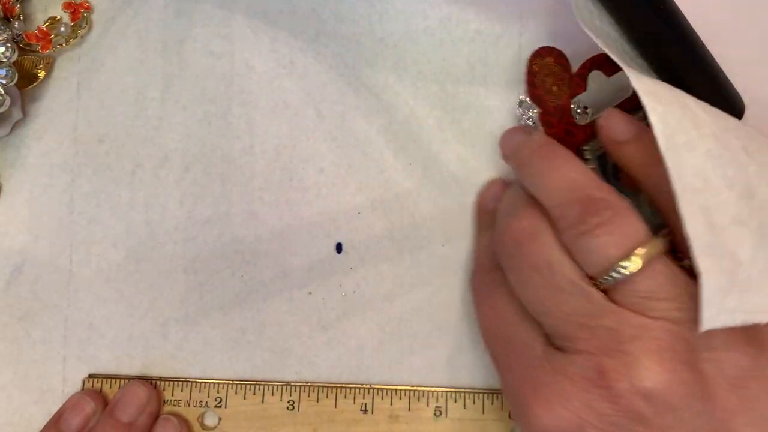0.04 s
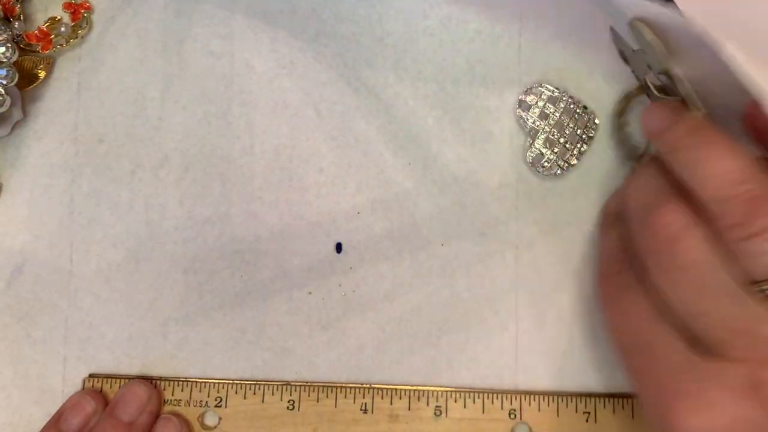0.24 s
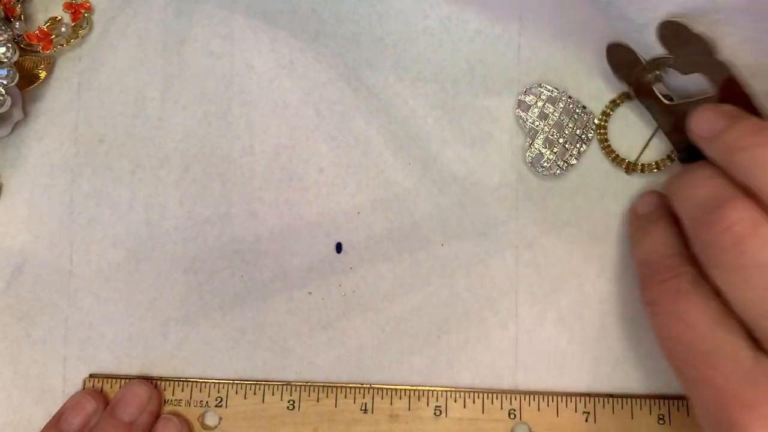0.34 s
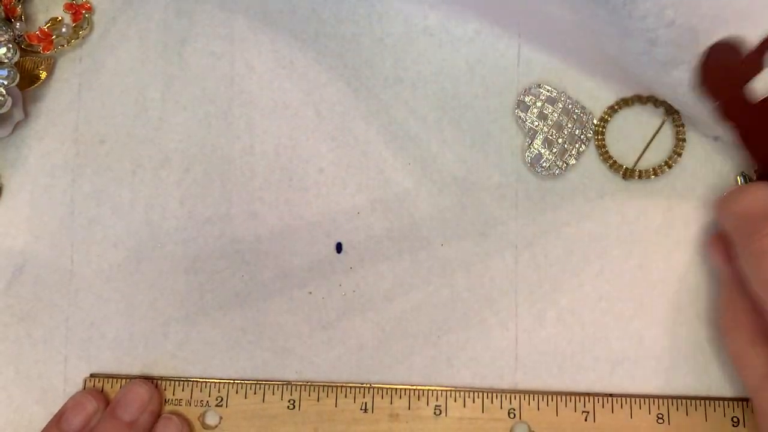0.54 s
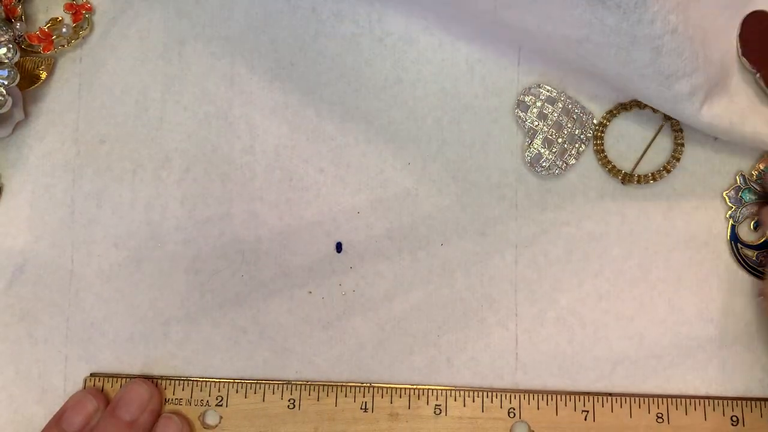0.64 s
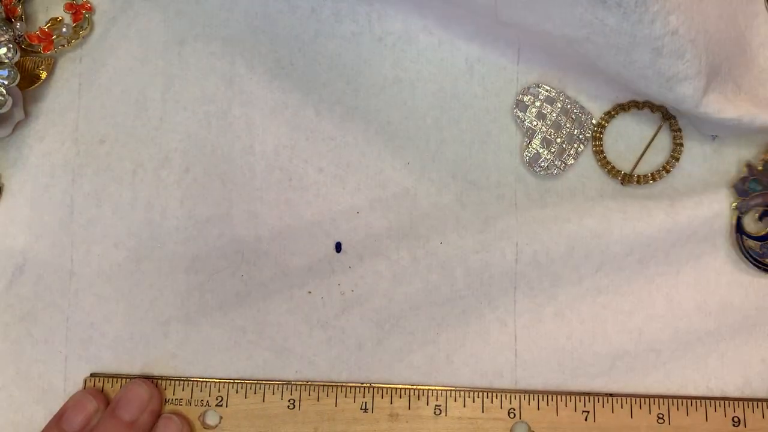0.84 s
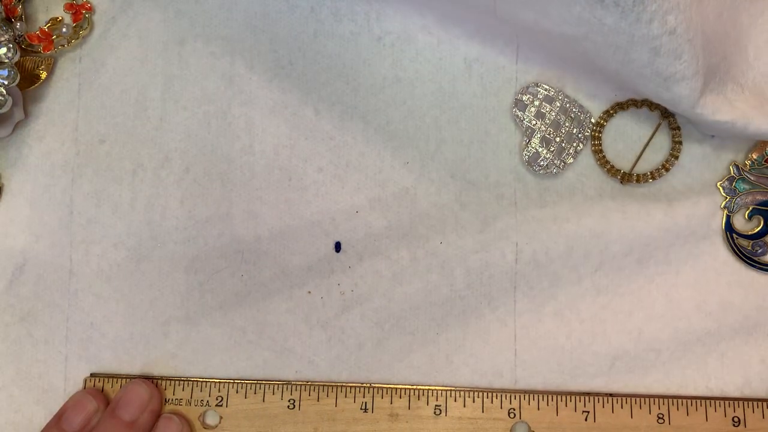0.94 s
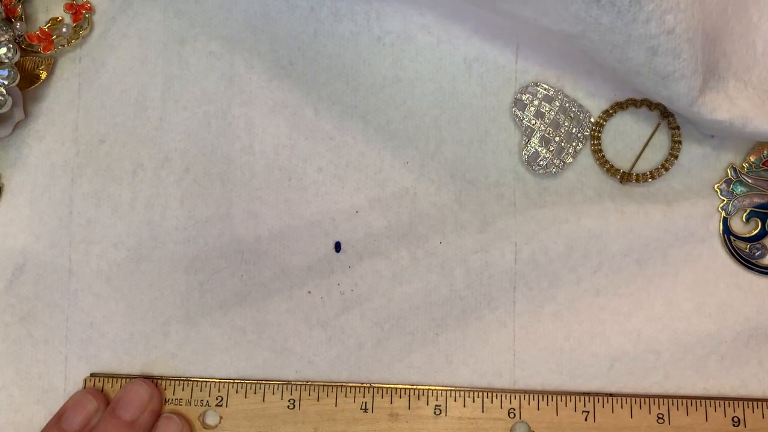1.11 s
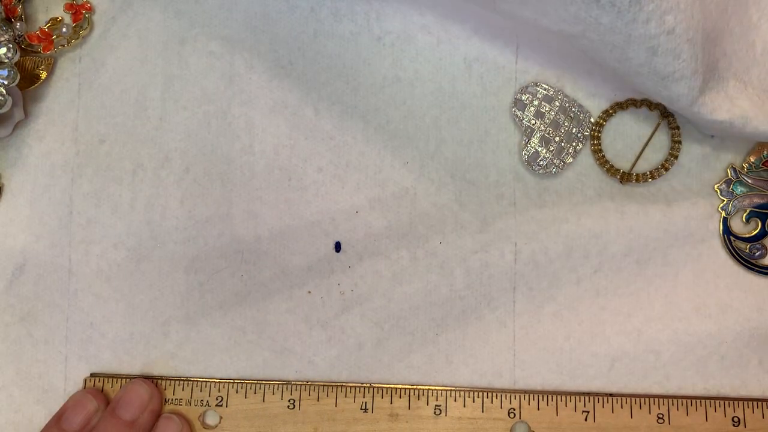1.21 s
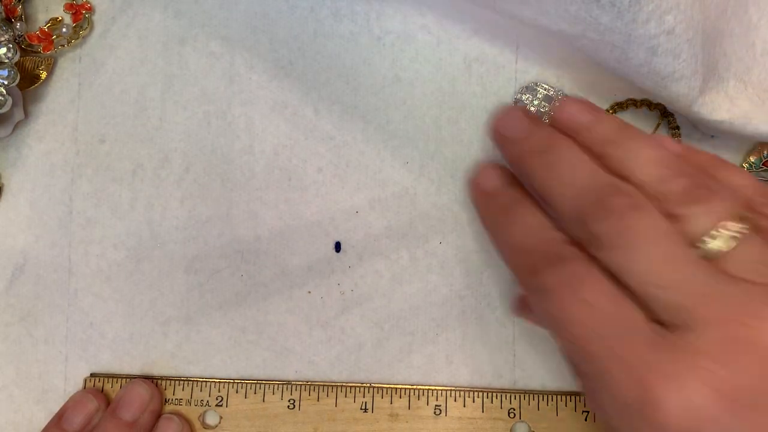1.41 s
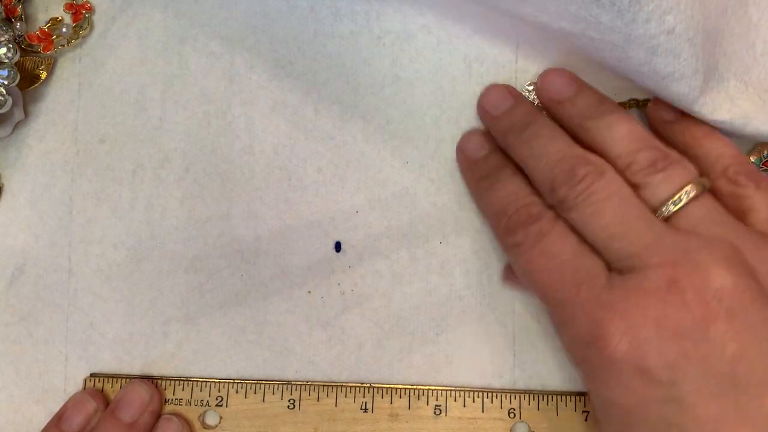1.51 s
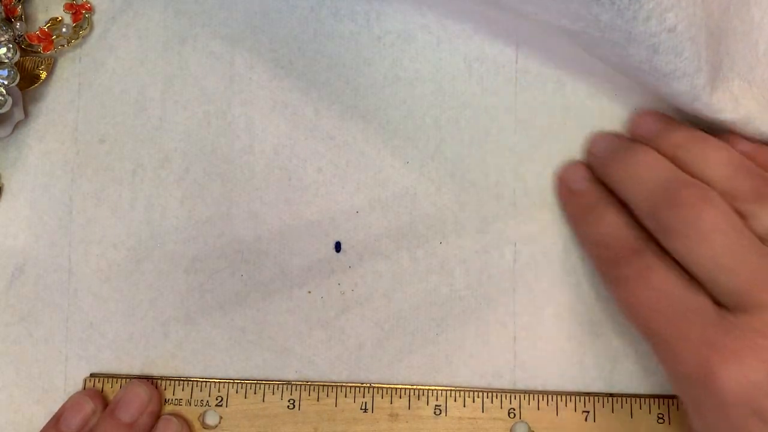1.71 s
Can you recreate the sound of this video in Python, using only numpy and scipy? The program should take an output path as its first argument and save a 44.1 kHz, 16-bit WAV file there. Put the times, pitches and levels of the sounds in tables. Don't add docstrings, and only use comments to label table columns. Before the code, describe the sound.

Close up in a quiet room, thin metal pins jingle and rub over cloth, a heavy piece hits the wooden table, sparser clinks follow, then stillness and a soft hand rustle with a tiny tick.

```python
import sys
import numpy as np
from scipy import signal
from scipy.fft import rfft, irfft, next_fast_len
from scipy.io import wavfile
from scipy.ndimage import uniform_filter1d

SR = 44100
rng = np.random.default_rng(int(sys.argv[2]) if len(sys.argv) > 2 else 0)


def linear_from_db(decibels):
    return 10 ** (np.asarray(decibels, float) / 20)


def unload_wav(signal):
    wavfile.write(
        sys.argv[1],
        SR,
        np.round(np.clip(np.atleast_2d(signal).T, -1, 1) * 32767).astype(np.int16),
    )


N = 77175

# time in seconds, level in dB.
SCRAPE_LEVEL = [(0, -50), (.19, -39), (.21, -35), (.33, -35.5), (.41, -41.5), (.45, -36), (.5, -39.5),
                (.57, -33), (.78, -36.5), (.8, -38), (.825, -46.5), (.9, -40.5), (1.05, -46.5), (1.07, -58),
                (1.13, -64.5), (1.15, -47), (1.23, -65), (1.3, -120)]
# frequency in Hz, density in dB per Hz.
CLOTH_COLOUR = [(300, 0), (1000, 0), (2400, -0.5), (3800, 1), (7500, 0), (12000, -5), (16000, -4.5)]
BROOCH_MODES = [3050, 3700, 4300, 5500, 6400, 7600, 8700, 10050, 11400, 12400, 14050, 15300]
# start in seconds, peak in dB, ring in Hz.
CLINKS = [(0.0253, -33.5, 5660), (0.1062, -27.5, 4140), (0.1437, -27.5, 7530), (0.2034, -26, 3030),
          (0.2149, -23.5, 7780), (0.2448, -25, 7640), (0.2947, -24.5, 7660), (0.3209, -12.5, 3840),
          (0.382, -27, 7570), (0.4209, -29.5, 7410), (0.6215, -16, 2930), (0.631, -23.5, 7180),
          (0.7312, -35, 6600), (0.8584, -37.5, 7750), (0.8984, -32, 7570), (0.9224, -21, 7344),
          (1.0128, -24.5, 3470), (1.042, -34, 5560), (1.0856, -44, 6470), (1.1387, -31.5, 3750),
          (1.1554, -27.5, 4190), (1.1643, -24, 3790), (1.1794, -33, 3760), (1.2121, -31.5, 3576)]
# start in seconds, peak in dB, ring in Hz.
TINKS = [(0.0687, -40.5, 10760), (0.2039, -35, 15300), (0.2338, -28, 14500), (0.274, -34, 10860),
         (0.3212, -23, 9830), (0.3343, -26.5, 10400), (0.38, -33.5, 10650), (0.4274, -24, 13700),
         (0.5242, -34.5, 9900), (0.5609, -20, 13600), (0.586, -28, 9700), (0.6892, -28, 10530),
         (0.7039, -31, 10400), (0.7296, -32.5, 10500), (0.7887, -34.5, 15600), (0.922, -40, 9580),
         (0.9948, -40, 11570), (1.026, -42, 11500), (1.1393, -52, 14990), (1.1554, -61, 11960),
         (1.1812, -46, 9230), (1.2126, -71.5, 10700)]
# start in seconds, peak in dB, ring in Hz, t60 in seconds.
PINGS = [(0.026, -32.5, 8760, 0.11), (0.319, -19, 3535, 0.044), (.3225, -27.5, 6250, .025),
         (0.3222, -20.5, 12740, 0.017), (0.4207, -13, 4345, 0.021), (0.4295, -19, 14030, 0.06),
         (0.4429, -19, 14060, .05), (.732, -25, 9520, .06), (.759, -37, 15300, .08),
         (.761, -41, 11300, .08), (1.634, -45, 11470, 0.14), (1.632, -46, 9140, .03)]
# start in seconds, peak in dB, centre in Hz, length in seconds.
TICKS = [(0.0005, -38, 8000, .003), (0.009, -40, 11000, .003), (0.030, -34, 14000, .003),
         (0.0695, -32, 8000, .001), (0.192, -31, 6000, .002), (0.204, -28, 10000, .002),
         (0.3815, -26, 9000, .002), (0.5496, -32, 7000, .003), (0.610, -31, 6400, .003),
         (0.6888, -28, 12000, .002), (0.7455, -32, 8000, .002), (0.7575, -31, 9000, .003),
         (0.7745, -32, 7000, .003), (0.7915, -19, 9000, .0012), (0.7985, -26, 10000, .0025),
         (0.806, -25, 10000, .002), (0.5227, -29, 9000, .004), (0.429, -24, 15000, .002),
         (1.0415, -37, 9000, .002), (0.8275, -38, 7000, .002), (0.9228, -32, 8000, .0015),
         (1.0844, -44, 7000, .002), (1.122, -48, 6000, .002), (1.140, -31, 12000, .001),
         (1.156, -38, 9000, .002), (1.165, -30, 5500, .001), (1.1745, -39, 6000, .001),
         (1.180, -39, 8000, .002), (1.2135, -32, 7000, .001), (1.220, -45, 6000, .0015),
         (1.239, -52, 6000, .001), (1.6325, -30, 11000, .0012)]
# mode in Hz, level in dB, t60 in seconds.
KNOCK_MODES = [(162.3, -13, 0.49), (198.9, -8, 0.1), (278, -2.5, 0.019), (350.1, -2.5, 0.069),
               (505.8, -13, 0.042), (600, -10.5, .04), (864, -10.5, 0.014), (1040, -4.5, 0.0097),
               (1367, 1, 0.023), (1587, -2, 0.047), (1977, -2, 0.024), (2454, 3.5, 0.01),
               (3017, 5.5, 0.0091), (3750, -4.5, 0.0063)]
# frequency in Hz, density in dB per Hz.
SHUDDER_COLOUR = [(100, -31), (300, -1), (1200, -3), (3000, -12.5), (4500, -41)]
# start in seconds, peak in dB, contact in Hz, deep table ring over the peak in dB.
BUMPS = [(0.011, -43, 1598, -10.5), (0.037, -46.5, 1685, -11), (0.066, -38, 1790, 8.5),
         (0.088, -32.5, 1660, -7), (0.222, -32, 2135, -17), (0.276, -35.5, 1030, 2),
         (0.293, -30.5, 1072, -4.5), (0.32, -37.5, 2504, 15.5), (0.397, -27, 1119, -3),
         (0.493, -41.5, 1450, -4.5), (0.595, -21, 1740, -12.5), (0.621, -27, 1517, 3),
         (1.14, -42.5, 1594, 10), (1.156, -43.5, 890, 14.5)]
# time in seconds, level in dB.
PALM_LEVEL = [
    (1.53, -100),
    (1.543, -77),
    (1.555, -58),
    (1.585, -63),
    (1.63, -50.5),
    (1.665, -48),
    (1.7, -49),
    (1.724, -48.5),
    (1.75, -52),
]
# frequency in Hz, density in dB per Hz.
PALM_COLOUR = [(500, -15.5), (2000, -13), (6000, -10), (11000, -1.5), (16000, -4)]
# mode in Hz, width in Hz, level in dB.
TABLE_MODES = [(58, 44, -14), (104, 33, -25.5), (169.1, 14, 5.5), (203.2, 3.3, 0.5), (251.7, 290, 11),
               (358.4, 45, 1), (457, 92, 1.5), (810, 440, -24)]
# time in seconds, level in dB.
LOAD_LEVEL = [(0, -56.5), (.1, -60), (.3, -44), (.45, -45.5), (.6, -40.5), (.8, -45), (1.02, -43),
              (1.09, -54.5), (1.17, -47), (1.26, -59.5), (1.33, -83), (1.54, -89), (1.58, -66.5),
              (1.67, -68)]
# time in seconds, level in dB.
HEEL_LEVEL = [
    (1.55, -88),
    (1.58, -56),
    (1.63, -56),
    (1.7, -62.5),
    (1.75, -73),
]
# frequency in Hz, t60 in seconds.
ROOM_DECAY = [(200, 0.47), (1500, 0.56), (3000, 0.1), (4500, 0.27), (10000, 0.063)]
# frequency in Hz, density in dB per Hz.
AIR_COLOUR = [(25, -16), (50, 2), (125, 1), (240, -1), (350, -17), (800, -26), (2500, -31), (16000, -37)]
# frequency in Hz, lead of the left in radians, left minus right in dB.
SPREAD = [(0, 0, -1), (400, -.4, -3.5), (1300, .3, -2), (2400, 1.6, -3), (3300, 1.3, .5), (4000, 2.0, 0),
          (4750, 3.14, 0), (15300, 18.85, 0), (22050, 28.9, 0)]

BROOCH_T60_S = 0.017
GRAINS_PER_S, GRAIN_SPREAD_DB = 700, 2.8
CHATTER_S = 0.0018


def evened(x):
    return x / np.sqrt(np.mean(x ** 2) + 1e-20)


def coloured(x, points):
    f, db = np.transpose(points)
    hz = np.fft.rfftfreq(N, 1 / SR)
    gain = linear_from_db(np.interp(np.log(hz + 1), np.log(f), db))
    return irfft(rfft(x) * gain, N)


def above(x, edge_hz):
    return signal.sosfilt(signal.butter(4, edge_hz, "high", fs=SR, output="sos"), x)


def envelope(rows):
    s, db = np.transpose(rows)
    return linear_from_db(np.interp(np.arange(N) / SR, s, db))


def flicker(size, depth_db, highest):
    wander = uniform_filter1d(uniform_filter1d(rng.standard_normal(N), size=size), size=size)
    return linear_from_db(depth_db * np.clip(evened(wander), -2, highest))


def add(mix, s, sound):
    part = mix[round(s * SR):][:len(sound)]
    part += sound[:len(part)]


def ring(hz, db, t60, size=6000):
    t = np.arange(size) / SR
    return linear_from_db(db - 60 * t / t60) * np.sin(2 * np.pi * hz * t)


def clicks(per_s, spread_db):
    happens, sign, size = rng.random((N, 3)).T
    size_db = spread_db * np.minimum(-np.log(size + 1e-9), 3)
    return (happens < per_s / SR) * np.sign(sign - .5) * linear_from_db(size_db)


def struck(sound, length_s):
    t = np.arange(500) / SR
    push, happens = rng.random((500, 2)).T
    hits = (push - .5) * (happens < .06) * np.exp(-t / length_s)
    hits[0] = .2
    out = signal.oaconvolve(sound, hits)
    return out * abs(sound).max() / abs(out).max()


def table(push):
    out = 0
    for hz, width, db in TABLE_MODES:
        mode = ring(hz, db, 4.54 / width, size=16000) * np.sqrt(width)
        out = out + signal.oaconvolve(push, mode)[:len(push)]
    return out


def scrape():
    modes = np.outer(BROOCH_MODES, [.94, 1, 1.06]).ravel()
    catches = clicks(GRAINS_PER_S, GRAIN_SPREAD_DB)
    piece = rng.integers(0, len(modes), (N, 3))
    grains = 0
    for k, hz in enumerate(modes):
        hits = catches * (piece == k).any(1)
        grains = grains + signal.oaconvolve(hits, ring(hz, 0, BROOCH_T60_S, size=1500))[:N]
    grains = evened(coloured(grains, CLOTH_COLOUR))
    friction = flicker(250, 2.2, 1.5)
    rub = evened(coloured(rng.standard_normal(N), CLOTH_COLOUR))
    return envelope(SCRAPE_LEVEL) * friction * (linear_from_db(-2) * grains + linear_from_db(-5) * rub)


def clink(luck, peak_db, hz, t60=0.025):
    metal = 0.6 * ring(hz, 0, t60)
    metal += 0.35 * ring(hz * (1.004 + 0.02 * luck[0]), 0, 0.6 * t60)
    for u, f in zip(luck[1:], BROOCH_MODES):
        side_db = -3.5 - 20 * u - 9.5 * abs(np.log2(f / hz))
        metal += ring(f * (.96 + 0.048 * luck[0]), side_db, BROOCH_T60_S)
    metal = struck(metal, CHATTER_S)
    t = np.arange(len(metal)) / SR
    lowpass = signal.butter(1, min(1.5 * hz, 20000), fs=SR)
    crack = evened(signal.lfilter(*lowpass, rng.standard_normal(len(metal)))) * np.exp(-t / .0022)
    return linear_from_db(peak_db) * above(metal + linear_from_db(-8.5) * crack, 3700)


def clinks():
    out = np.zeros(N)
    for rows in (CLINKS, TINKS, PINGS):
        for row, luck in zip(rows, rng.random((len(rows), len(BROOCH_MODES) + 1))):
            add(out, row[0], clink(luck, *row[1:]))
    return out


def ticks():
    out, t = np.zeros(N), np.arange(900) / SR
    for s, peak_db, hz, length_s in TICKS:
        band = signal.butter(1, [.45 * hz, min(1.8 * hz, 20000)], "band", fs=SR)
        burst = evened(above(signal.lfilter(*band, rng.standard_normal(900)), 3000))
        shape = np.minimum(t / .0002, 1) * np.exp(-t / length_s)
        add(out, s, linear_from_db(peak_db) * burst * shape)
    return out


def knock():
    knock_s, knock_db, bass_lag_s = .5295, -11.5, .004
    out, t = np.zeros(N), np.arange(N) / SR - knock_s
    for hz, db, t60 in KNOCK_MODES:
        mode = ring(hz, knock_db + db, t60, size=16000)
        if hz > 900:
            mode = struck(mode, 0.0017)
        add(out, knock_s + bass_lag_s * max(1 - hz / 3200, 0), mode)
    skid = linear_from_db(-29) * np.exp(np.minimum(t, 0) / .004)
    shake = linear_from_db(-26 - 60 * np.maximum(t, 0) / 0.3)
    shudder = evened(coloured(rng.standard_normal(N), SHUDDER_COLOUR))
    return above(out + shudder * np.where(t > 0, shake, skid), 170)


def bumps():
    out = np.zeros(N)
    push = uniform_filter1d(np.eye(1, 12000, 40)[0], size=40)
    deep = table(push)
    deep = above(deep / abs(deep).max(), 120)
    for s, peak_db, hz, deep_db in BUMPS:
        contact = ring(hz, peak_db, 0.0095) + ring(1.45 * hz, peak_db - 2, 0.0082)
        add(out, s, struck(contact, CHATTER_S))
        add(out, s, linear_from_db(peak_db + deep_db) * deep)
    return out


def palm():
    grain = rng.standard_normal(N) + 0.15 * clicks(GRAINS_PER_S, GRAIN_SPREAD_DB)
    band = evened(signal.oaconvolve(grain, ring(6900, 0, .003, size=800))[:N])
    growth = np.clip((np.arange(N) / SR - 1.64) / 0.19, 0, 1)
    rub = evened(coloured(grain, PALM_COLOUR)) + linear_from_db(-5) * band * growth
    return envelope(PALM_LEVEL) * flicker(200, 1.8, 2) * rub


def rumble():
    slips = clicks(300, 3.)
    load = evened(table(uniform_filter1d(slips, size=12)))
    heel = evened(signal.oaconvolve(uniform_filter1d(slips, size=80), ring(158, 0, 0.03))[:N])
    return envelope(LOAD_LEVEL) * load + envelope(HEEL_LEVEL) * heel


def room(x):
    taps = np.zeros((2, SR))
    starts = np.arange(200, SR - 20, 20)
    at = starts + rng.integers(0, 20, (2, len(starts)))
    np.put_along_axis(taps, at, rng.choice([-1., 1.], at.shape), 1)
    hz, t, z = signal.stft(taps, SR, nperseg=256)
    f, t60 = np.transpose(ROOM_DECAY)
    t60 = np.interp(np.log(hz + 1), np.log(f), t60)[:, None]
    tail = signal.istft(z * linear_from_db(-60 * t / t60), SR, nperseg=256)[1]
    wet = signal.fftconvolve(x[None], tail / np.linalg.norm(tail[0]), axes=1)[:, :N]
    tilt = [(1000, 0.0037), (16000, 0)]
    return linear_from_db(-5.5) * coloured(wet, tilt)


def still_air():
    noise = rng.standard_normal((2, N)) + 3 * rng.standard_normal(N)
    return linear_from_db(-66) * evened(coloured(noise, AIR_COLOUR))


def scene():
    near = scrape() + palm() + clinks() + bumps() + ticks()
    low, blow = rumble(), knock()
    air = still_air()
    return near + low + blow + room(near + .55 * blow + 0.037 * low) + air


def low_pass(x):
    return signal.sosfilt(signal.butter(12, 16690, fs=SR, output="sos"), x)


def record(dry):
    size = next_fast_len(N + 2048)
    hz = np.fft.rfftfreq(size, 1 / SR)
    left, right = rfft(dry, size)
    f, lead, balance_db = np.transpose(SPREAD)
    lead = np.interp(hz, f, lead)
    lead = lead - .2 * np.sin(2 * lead)
    half = linear_from_db(np.interp(hz, f, balance_db) / 2)
    width = np.clip((2800 - hz) / 900, .02, 1) * np.clip(hz / 900, 0, .8)
    mid, side = (left + right) / 2, (left - right) / 2 * width
    high_cut = linear_from_db(-35 * np.clip((hz - 15850) / 150, 0, 1))
    low_cut = 1 / np.sqrt(1 + (46 / (hz + 1)) ** 10)
    pair = np.array([(mid + side) * half * np.exp(1j * lead), (mid - side) / half])
    return low_pass(irfft(pair * high_cut * low_cut, size)[:, :N])


dry = scene()
out = record(dry)
unload_wav(out)
```